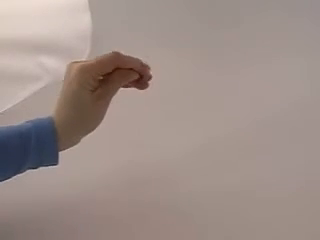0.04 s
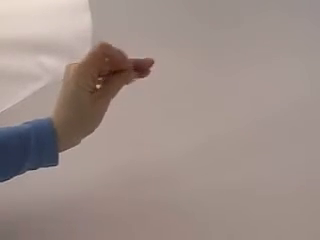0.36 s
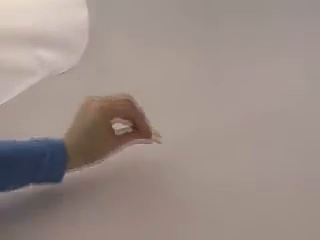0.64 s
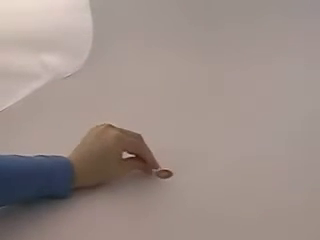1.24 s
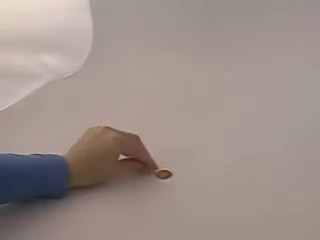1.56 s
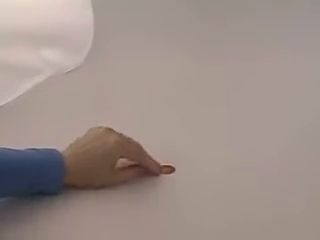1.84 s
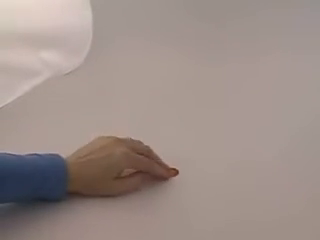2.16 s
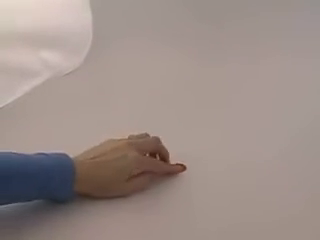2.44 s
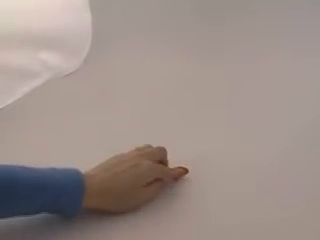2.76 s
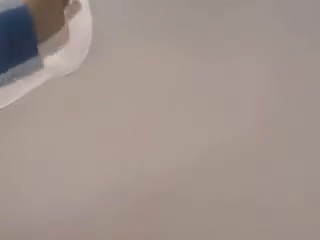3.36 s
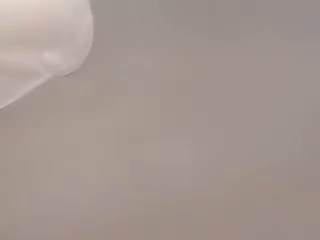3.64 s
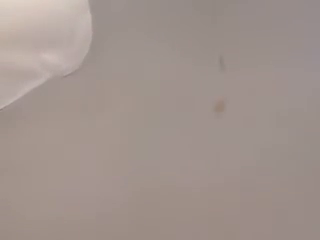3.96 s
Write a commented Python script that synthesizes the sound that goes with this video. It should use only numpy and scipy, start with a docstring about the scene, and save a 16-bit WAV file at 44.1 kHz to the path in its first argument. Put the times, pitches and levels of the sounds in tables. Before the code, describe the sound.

In a quiet, bare room, a hand taps a small metal disc onto a table, rubs it softly and withdraws with a rustling sleeve. Then the disc pops, its sharp crack and high ping leaving a short echo.

```python
"""A bare room with a table. A hand sets down a small domed metal disc with a few ticks and thuds,
rubs and presses it with a finger, and withdraws with a rustle of sleeve.
A moment later the disc snaps through and jumps: a crack and a high ping that fill the room.
A limiter ducks the snap and lets the echo swell back."""
import sys
import numpy as np
from scipy import signal
from scipy.fft import rfft, irfft
from scipy.io import wavfile
from scipy.ndimage import minimum_filter1d

SR = 44100
rng = np.random.default_rng(int(sys.argv[2]) if len(sys.argv) > 2 else 0)


def dump_mix(stems):
    """Bounce the given channels to the path in sys.argv[1] as a 16-bit WAV at rate SR."""
    frames = np.atleast_2d(stems).T  # one column per channel
    limited = np.clip(frames, -1, 1)  # hard clip at full scale
    pcm = np.round(limited * 32767).astype(np.int16)
    wavfile.write(sys.argv[1], SR, pcm)


N = 176400


def amp(db):
    """Decibels to gain."""
    return 10 ** (np.asarray(db) / 20)


def unit(x):
    """Scales to an rms of one."""
    return x / np.sqrt(np.mean(x ** 2) + 1e-20)


def curve_at(points, hz):
    """Reads a table on a log-frequency axis."""
    f, value = np.transpose(points)
    return np.interp(np.log(hz + 1), np.log(f + 1), value)


def equalise(x, colour, gain_db=0):
    """Filters a sound by an EQ curve of (f/Hz, level/dB) points."""
    size = x.shape[-1]
    response = amp(gain_db + curve_at(colour, np.fft.rfftfreq(size, 1 / SR)))
    return irfft(rfft(x) * response, size)


def fader(points):
    """Gain over time from (t/s, level/dB) points."""
    return amp(np.interp(np.arange(N) / SR, *np.transpose(points)))


def gate(spans, edge_s):
    """Gain over time from (start/s, end/s, level/dB) rows, with soft edges."""
    t = np.arange(N) / SR
    return sum(amp(db) * np.clip(np.minimum(t - start, end - t) / edge_s + .5, 0, 1)
               for start, end, db in spans)


def add(mix, start_s, sound):
    """Mixes a sound in at a time."""
    part = mix[..., round(start_s * SR):][..., :sound.shape[-1]]
    part += sound[..., :part.shape[-1]]


def stereo(mid, side, width_db):
    """Left and right from a centre and an unrelated side signal; the treble stays centred."""
    # EQ of the side signal: f/Hz, level/dB
    side_colour = [(50, -1.5), (150, -11.5), (300, -3.5), (550, -1.5), (1200, -5), (3600, -1),
                   (4200, -15.5), (5500, -68)]
    side = equalise(side, side_colour, width_db)
    return np.array([mid + side, mid - side])


def hiss(colour, width_db=0):
    """Coloured stereo noise."""
    mid, side = unit(equalise(rng.standard_normal((2, N)), colour))
    return stereo(mid, side, width_db)


def friction(colour, grain_db, grain_hz, width_db):
    """Noise whose strength jumps as the surfaces catch and slip."""
    hz = np.fft.rfftfreq(N, 1 / SR)
    catch = unit(irfft(rfft(rng.standard_normal(N)) / (1 + (hz / grain_hz) ** 2), N))
    return hiss(colour, width_db) * unit(amp(grain_db * catch))


def burst(colour, decay_s, size=8192):
    """A short impact of unit energy: dying noise, evened out to a smooth colour."""
    t = np.arange(size) / SR
    x = rng.standard_normal(size) * np.exp(-t / decay_s)
    taper = (t < t[size // 2]) / (1 + (t / (2 * decay_s)) ** 2)
    for _ in range(3):  # flatten the spectrum while keeping the hit short
        spectrum = rfft(x * taper)
        x = irfft(spectrum / (abs(spectrum) + 1e-12))
    x = equalise(x, colour)[:size // 2]
    return x / np.linalg.norm(x)


def room_tone():
    """A steady, faint bed of low air."""
    # colour of the air: f/Hz, level/dB
    colour = [(20, -25), (45, -6), (75, -4), (120, -5.5), (185, 4.5), (260, -2), (360, -7.5), (800, -10.5),
              (2200, -13), (3300, -19.5), (4500, -17.5), (7000, -29), (12000, -35)]
    return amp(-55) * hiss(colour)


def cloth_swish():
    """A soft brush of cloth, already fading."""
    # colour of the brush: f/Hz, level/dB
    colour = [(800, -25), (2700, 5), (4800, -2), (8000, -25)]
    start_db, fade_db_per_s = -54, 130
    return amp(start_db - fade_db_per_s * np.arange(N) / SR) * hiss(colour, width_db=-5)


def skin_rub():
    """Skin rubs on the disc and table with a bright, fine grain."""
    # swells of the rubbing: t/s, relative level/dB
    strokes = [(0, -72), (.18, -70), (.55, -73.5), (.77, -54), (1.0, -53.5), (1.05, -54), (1.078, -53),
               (1.095, -61.5), (1.15, -66), (1.23, -60), (1.35, -73), (1.5, -65.5), (1.986, -52),
               (2.038, -56.5), (2.06, -52), (2.09, -55.5), (2.11, -57.5), (2.135, -60), (2.15, -53),
               (2.298, -50), (2.32, -47), (2.37, -47), (2.39, -48.5), (2.446, -52.5), (2.505, -50),
               (2.525, -58.5), (2.568, -56), (2.64, -60.5), (2.78, -52.5), (2.896, -45.5), (2.95, -53.5),
               (3.04, -57), (3.118, -55), (3.4, -54.5), (3.6, -70)]
    # colour of the skin friction: f/Hz, level/dB
    colour = [(200, -35), (700, -7), (2000, -0.5), (3500, -1), (6500, 1), (9500, -2), (11000, -3),
              (12500, -5)]
    return amp(2.5) * fader(strokes) * friction(colour, grain_db=1, grain_hz=159, width_db=-2.5)


def sleeve_slide():
    """The sleeve slides with a duller rustle as the arm moves."""
    # swells of the rustle: t/s, level/dB
    moves = [(0, -76), (.1, -63), (.56, -67.5), (.63, -49), (.72, -52), (.8, -49), (.95, -47), (1.04, -55),
             (1.4, -77), (1.7, -57), (1.92, -54.5), (2.12, -64), (2.25, -62.5), (2.76, -60), (2.82, -52),
             (2.95, -51.5), (3.03, -54), (3.15, -48.5), (3.23, -55), (3.35, -53.5), (3.6, -72)]
    # colour of the fabric: f/Hz, level/dB
    colour = [(100, -11.5), (250, -5), (360, -0.5), (500, 5.5), (680, -1), (920, -3), (1150, 0), (1480, 5),
              (1750, 0.5), (2100, -7.5), (3300, -24), (9000, -41)]
    return fader(moves) * friction(colour, grain_db=-0.5, grain_hz=70, width_db=-5)


def low_flutter():
    """Uneven soft bumps in one low resonance while the hand moves in."""
    # spells of flutter: start/s, end/s, level/dB
    spells = [(0.13, 0.462, -49.5), (0.57, 0.969, -52.5)]
    # one narrow low peak: f/Hz, level/dB
    colour = [(60, -16), (150, -13), (215, -9), (252, 6.5), (295, -9), (380, -11.5), (700, -23.5),
              (1500, -49), (4000, -62)]
    return gate(spells, edge_s=0.035) * friction(colour, grain_db=3, grain_hz=80, width_db=-9)


def table_touches():
    """Disc and fingers meet the table: a damped tick, its scatter off nearby surfaces, and a thud."""
    # contacts: t/s, tick level/dB, thud level/dB
    contacts = [(.512, -36, -32), (0.955, -23, -11.5), (0.956, -28, -11.5), (0.961, -25.5, -17),
                (0.969, -20.5, -30), (1.2404, -29.5, -43), (1.2411, -17, -26), (1.275, -29, -42),
                (2.0497, -32, -51), (3.255, -24.5, -29)]
    # bright edge of a contact: f/Hz, level/dB
    tick_colour = [(200, -16.5), (800, 7), (1400, 8.5), (3000, 1.5), (6000, 4.5), (9500, 5), (12000, -1)]
    # body of the table top: f/Hz, level/dB
    thud_colour = [(40, 11), (120, -17), (260, 2.5), (480, -1), (750, -2.5), (1400, -11), (2500, -17),
                   (8000, -63)]
    taps = np.zeros(N)
    for start_s, tick_db, thud_db in contacts:
        tick = burst(tick_colour, decay_s=0.0021)
        scatter = amp(0.5) * burst(tick_colour, decay_s=0.021)
        thud = burst(thud_colour, decay_s=0.005)
        add(taps, start_s, amp(tick_db) * (tick + scatter) + amp(thud_db) * thud)
    return taps


def room_echo(sound):
    """A dense mono echo that dies sooner in the treble, with a few lingering resonances."""
    # decay of the room: f/Hz, t60/s
    decay = [(100, 0.52), (400, 0.8), (1000, 0.64), (1350, 0.58), (1900, 0.63), (3000, 0.58), (5000, 0.53),
             (7000, 0.46), (10000, 0.36), (11500, 0.18)]
    # colour of the echo: f/Hz, level/dB
    colour = [(150, -9), (450, 3.5), (900, 3), (1500, 0.5), (3000, -3), (5000, -7.5), (7000, 1.5),
              (10000, 2.5)]
    # resonances that stand out of the echo: f/Hz, relative level/dB, t60/s
    modes = [(416, -18.5, 0.77), (498, -12.5, 0.41), (662, -13, 0.6), (1320, -34, 0.48), (1320, -27, 1.09),
             (1416, -37, 0.94)]
    build_s, early_db, bloom_s = 0.0043, -2.5, .06
    hz, frame_s, spectra = signal.stft(rng.standard_normal(SR), SR, nperseg=256)
    shape_db = curve_at(colour, hz)[:, None] - 60 * frame_s / curve_at(decay, hz)[:, None]
    tail = signal.istft(spectra * amp(shape_db), SR, nperseg=256)[1][:SR]
    t = np.arange(SR) / SR
    bloom = amp(early_db * np.exp(-(t / bloom_s) ** 4))  # near walls answer first, then the echo blooms
    tail = unit(tail * (1 - np.exp(-t / build_s)) * bloom)
    for mode_hz, db, t60 in modes:
        tone = np.sin(2 * np.pi * (mode_hz * t + rng.random()))
        tail += amp(db) * unit(amp(-60 * t / t60) * tone)
    return amp(1.5) * signal.fftconvolve(sound, tail / np.linalg.norm(tail))[:N]


def hand_drag():
    """A finger pushes the disc along with a dull rasp."""
    # drags: start/s, end/s, level/dB
    drags = [(2.16, 2.5, -55.5), (2.8, 2.87, -49.5)]
    # colour of the rasp: f/Hz, level/dB
    colour = [(300, -20), (700, -3), (1100, 1), (2000, 2.5), (3000, -4.5), (5000, -21)]
    return gate(drags, edge_s=0.033) * hiss(colour, width_db=-2.5)


def disc_snap(start_s):
    """The dome flips with a crack that spreads briefly to the sides, and rings as it jumps."""
    # modes of the disc: f/Hz, level/dB, t60/s
    modes = [(7102, 20, 0.021), (7020, 12, 0.011), (10000, 2, 0.023), (9900, -5.5, 0.023)]
    # the dome flips, then its rim strikes the table: delay/s, level/dB
    cracks = [(0, 24.5), (.003, 15)]
    # colour of a crack: f/Hz, level/dB
    crack_colour = [(40, -29), (100, -27), (180, -7), (320, -17), (500, -21.5), (1000, -13), (1280, -3),
                    (1650, -5), (2700, -1), (5500, 0.5), (8000, -3.5), (11200, -9), (11900, -45)]
    # a brief stereo spread of the crack: f/Hz, level/dB
    spread_colour = [(40, -11), (110, -8), (260, 13), (550, 7), (1200, -9), (3000, 8), (4200, -8),
                     (6000, -34)]
    rise_s, sag_hz, sag_s = 0.002, 128, .003
    disc, spread = np.zeros((2, N))
    t = np.arange(SR // 4) / SR
    lag_cycles = sag_hz * sag_s * (1 - np.exp(-t / sag_s))  # starts flat while the dome swings wide
    ring = sum(amp(db - 60 * t / t60) * np.sin(2 * np.pi * (hz * t - lag_cycles))
               for hz, db, t60 in modes)
    add(disc, start_s, ring * (1 - np.exp(-(t / rise_s) ** 2)))
    for delay_s, db in cracks:
        add(disc, start_s + delay_s, amp(db) * burst(crack_colour, decay_s=0.0064))
    add(spread, start_s, burst(spread_colour, decay_s=0.0062))
    return stereo(mid=disc, side=spread, width_db=16.5)


def scene():
    """The disc, centred in the room, over the hand's noises and the room tone."""
    snap, taps = disc_snap(start_s=3.4299), table_touches()
    echo = room_echo(snap.mean(0) + amp(-10) * taps)  # touches reach the room only weakly
    hand = skin_rub() + sleeve_slide() + hand_drag() + cloth_swish()
    return snap + taps + echo + hand + low_flutter() + room_tone()


def record(dry):
    """A fast limiter that holds and then recovers slowly, soft overload, and the band limits."""
    threshold_db, attack_s, hold_s, release_s = -2.5, .0025, .04, 0.14
    ceiling, low_cut_hz, high_cut_hz = .74, 67, 12200
    over_db = np.maximum(20 * np.log10(abs(dry).max(0) + 1e-9) - threshold_db, 1e-9)
    half_hold = round(hold_s * SR / 2)
    held_db = -minimum_filter1d(-over_db, 2 * half_hold + 1, origin=half_hold)
    fade = np.arange(N) / SR / release_s
    released_db = np.exp(np.maximum.accumulate(np.log(held_db) + fade) - fade)  # each peak dies away
    pole = np.exp(-1 / (SR * attack_s))
    duck_db = signal.lfilter([1 - pole], [1, -pole], released_db)
    saturated = ceiling * np.tanh(dry * amp(-duck_db) / ceiling)
    low_cut = signal.butter(2, low_cut_hz, "highpass", fs=SR, output="sos")
    high_cut = signal.firwin(301, high_cut_hz, window=("kaiser", 9), fs=SR)
    return signal.oaconvolve(signal.sosfilt(low_cut, saturated), high_cut[None], "same")


dry = scene()
out = record(dry)
dump_mix(out)
```